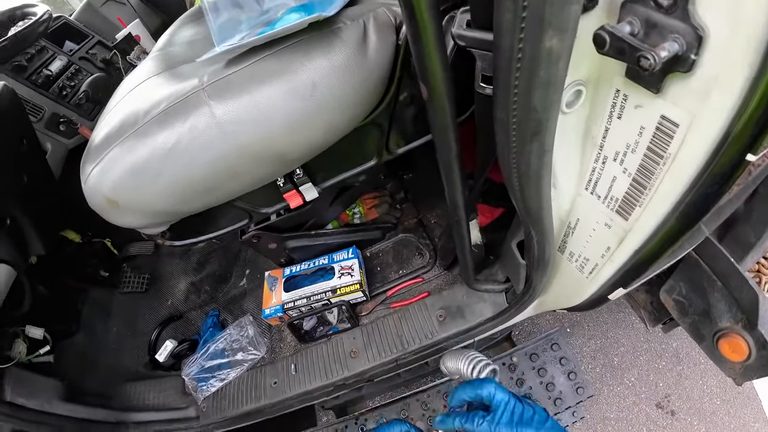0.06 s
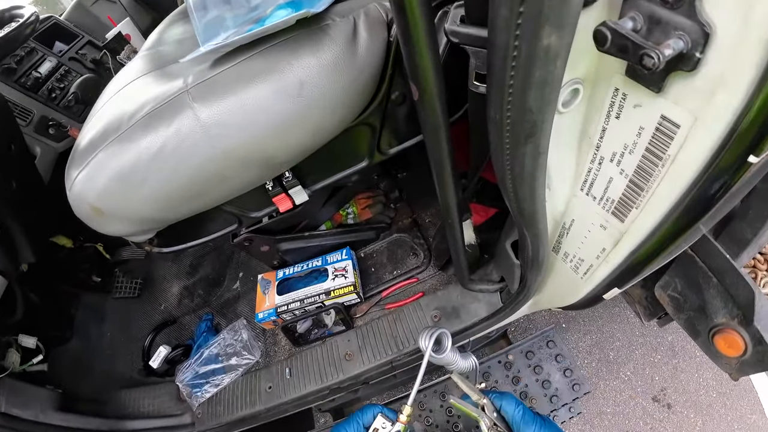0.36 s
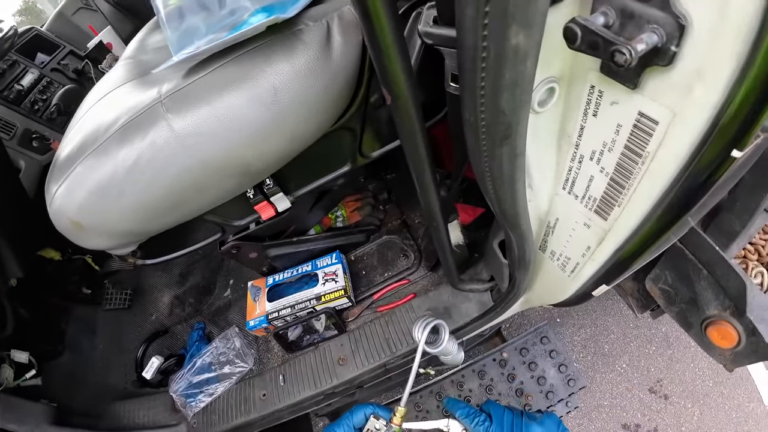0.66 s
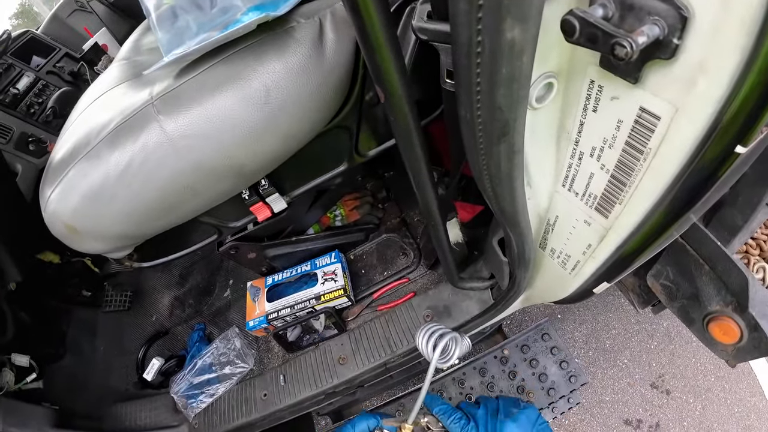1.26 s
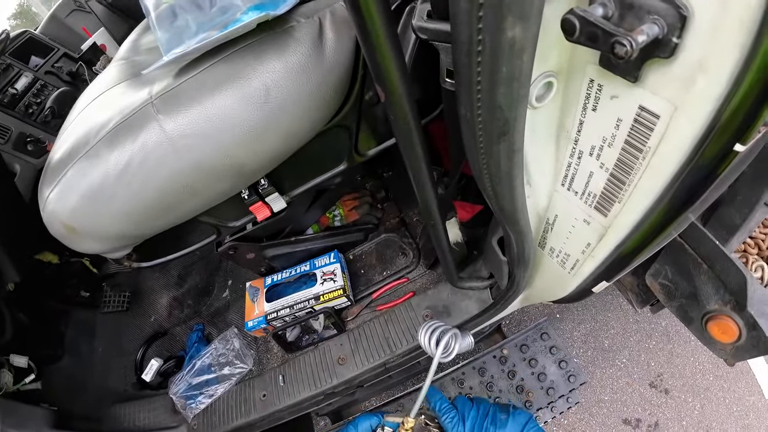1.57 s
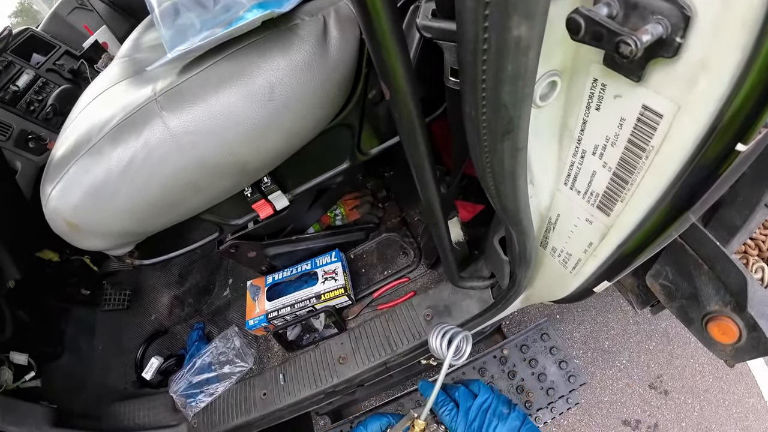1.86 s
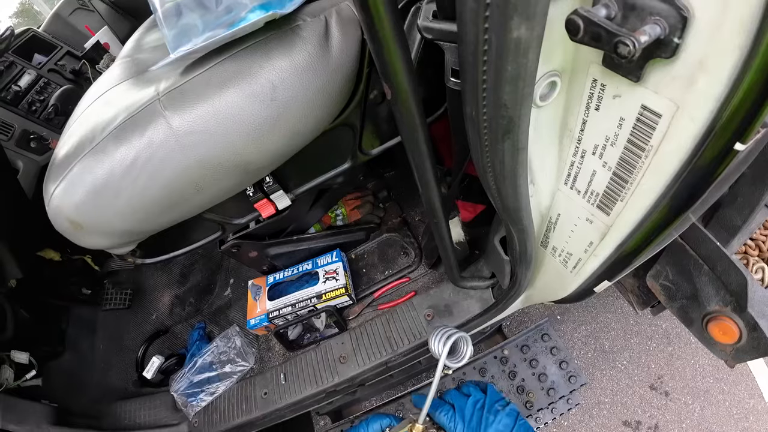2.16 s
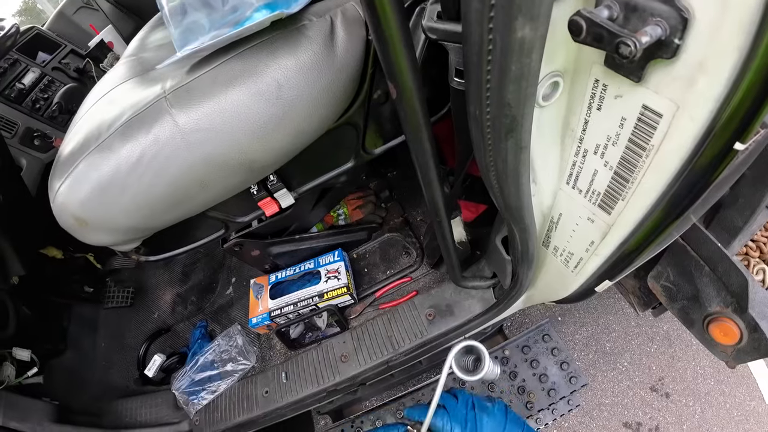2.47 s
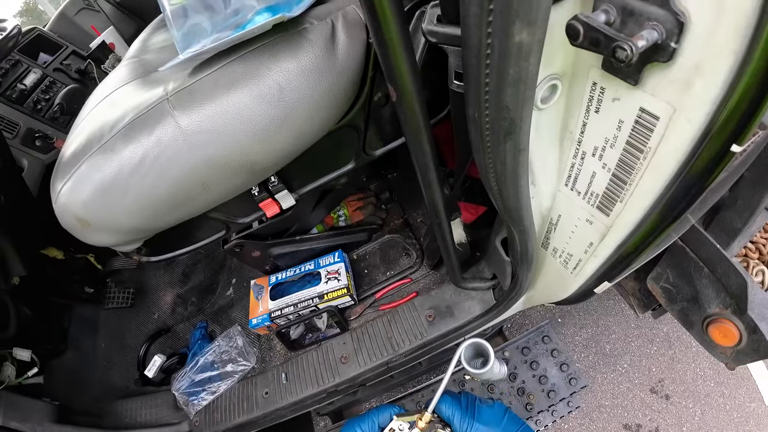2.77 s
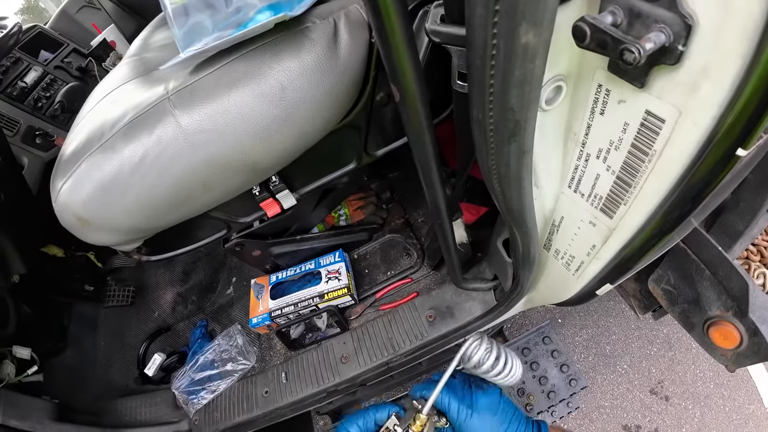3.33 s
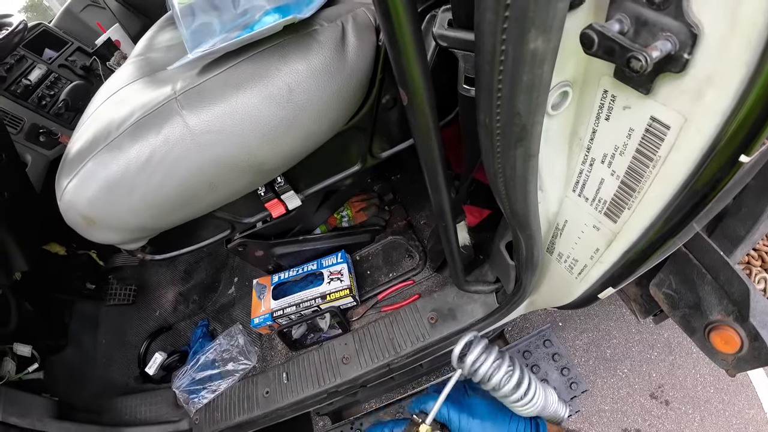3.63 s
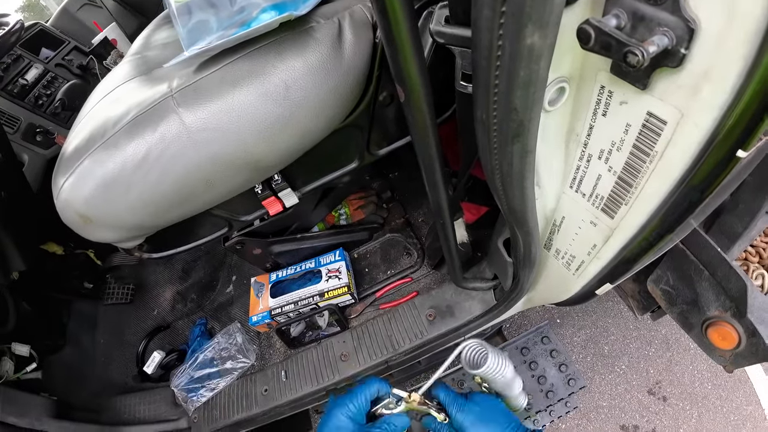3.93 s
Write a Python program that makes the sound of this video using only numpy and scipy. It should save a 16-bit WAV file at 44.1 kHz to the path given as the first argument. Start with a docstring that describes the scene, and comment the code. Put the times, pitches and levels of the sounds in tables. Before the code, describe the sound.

A coiled metal hose and its fitting clack and click as gloved hands turn them. One hollow clack comes first, then a small rattle and a cluster of sharp clicks, close by an open vehicle door over low outdoor rumble.

```python
"""Hollow clacks and sharp clicks sound as gloved hands turn a coiled metal hose and its brass fitting.
The parts knock together and ring, a loose piece rattles with a thin note, and the gloves rub softly.
The cab behind an open vehicle door gives each sound a short echo.
Underneath lie a low outdoor rumble, a faint machine hum and a far-off hiss."""
import sys
import numpy as np
from scipy import signal
from scipy.fft import rfft, irfft
from scipy.io import wavfile

SR = 44100
rng = np.random.default_rng(int(sys.argv[2]) if len(sys.argv) > 2 else 0)


def generate_wav(sig):
    """Save sig (samples, or channels by samples) to the path in sys.argv[1] as 16-bit PCM at SR."""
    pcm = np.round(np.clip(np.atleast_2d(sig).T, -1, 1) * 32767).astype(np.int16)
    wavfile.write(sys.argv[1], SR, pcm)


N = 176400
HIT_S = .25  # time allowed for one hit to die away

# The tone of the tick in a bounce or a light tap. Each row: frequency in Hz, level in dB.
TICK_COLOUR = [(500, -6), (1900, -7), (3000, 5.5), (4800, 0), (7700, -5.5), (8800, -12), (11500, -11.5),
               (13500, -25)]
TICK_FADE_S, TICK_ECHO_DB = .011, -9.5  # every fade time is the time to fall by 60 dB


def clacks():
    """A bright snap sets the hollow hose ringing, as far as the grip lets it."""
    # Each row: start in seconds, level in dB, treble limit in Hz, snap level in dB,
    # ring level in dB compared with the knock.
    hits = [(0.107, -32.5, 1060, -41, -20), (0.7461, -12.5, 6600, -31.5, -6.5),
            (0.8386, -34, 1490, -63, -26), (0.9079, -32, 2770, -50, -17), (3.2358, -17, 4170, -34.5, -16)]
    # The tone of the knock. Each row: frequency in Hz, level in dB.
    knock_colour = [(150, -13), (440, 0.5), (800, -1.5), (1150, -2), (1900, 3), (2600, -4), (3700, 0),
                    (5600, -3.5), (6800, -10.5), (13500, -3)]
    # The notes of the hose. Each row: pitch in Hz, level in dB, fade time in seconds.
    hose_notes = [(1250, -9, .1), (1470, -6, .06), (1740, -2, .03), (1890, 3, .018), (2930, 3, .028),
                  (5550, -2, .022)]
    out = np.zeros((2, N))
    for start, db, edge_hz, snap_db, ring_db in hits:
        knock = contact(knock_colour, fade_s=0.04, attack_s=0.0016)
        body = soften(knock + amp(ring_db) * ring(hose_notes), edge_hz)
        add(out, start, amp(db) * unit_hit(body) + amp(snap_db) * snap())
    return cab_echo(out, echo_db=-11)


def clicks():
    """Metal parts meet, and the rubber of the gloves snaps now and then; the hand damps the metal, so light
    clicks hardly ring."""
    # Each row: start in seconds, level in dB, brightness in dB per octave, fade time in seconds.
    hits = [(1.0291, -48, -3.5, 0.017), (1.1154, -38.5, -4.5, 0.034), (1.1208, -40, -0.5, .025),
            (2.066, -53, -1, 0.017), (2.203, -49, -2.5, 0.082), (3.1862, -12, 1, 0.015),
            (3.1942, -22, 2, 0.015), (3.739, -37, 2, 0.046), (3.8956, -18.5, -1.5, 0.017),
            (3.902, -37, 2, 0.073), (3.909, -37, 4, 0.017), (3.9305, -30, -7.5, 0.026),
            (3.9352, -30, -12.5, 0.017), (3.9567, -38.5, -12.5, 0.097), (3.9804, -39, -9, 0.051)]
    # The tone of a click. Each row: frequency in Hz, level in dB.
    click_colour = [(400, -54), (1400, -19), (1850, -6.5), (3200, -2), (4000, -1), (6100, -2.5), (7000, -4),
                    (11400, -9), (13200, -22), (15500, -21)]
    # The notes of the metal. Each row: pitch in Hz, level in dB, fade time in seconds.
    metal_notes = [(2170, -12, .05), (3720, -1, .028), (4100, 1, .03), (4970, -4, .03), (5850, 2, .03),
                   (6345, 3, .035), (6480, -35, .55), (9920, -9, .025)]
    # Snaps of the gloves' rubber. Each row: start in seconds, level in dB.
    rubber_snaps = [(0.073, -60), (0.4452, -44), (3.935, -37), (3.988, -22.5)]
    out = np.zeros((2, N))
    firmest_db = max(row[1] for row in hits)
    for start, db, tilt_db, fade_s in hits:
        click = contact(click_colour, fade_s, tilt_db, attack_s=0.0016)
        ring_db = -0.5 + (db - firmest_db) / 2
        add(out, start, amp(db) * unit_hit(click + amp(ring_db) * ring(metal_notes)))
    for start, db in rubber_snaps:
        add(out, start, amp(db) * snap())
    return cab_echo(out, echo_db=-16)


def snap():
    """A brief contact that is almost all high treble."""
    # Its tone. Each row: frequency in Hz, level in dB.
    snap_colour = [(500, -102), (5000, 1.5), (8500, 3), (10000, 14), (11800, 9), (13200, -13), (15500, 1)]
    return contact(snap_colour, fade_s=0.022)


def rattle(detune=.007):
    """A loose piece bounces on the fitting: a tick and a thin ring whose pitches shift with the grip."""
    # Each row: start in seconds, level in dB.
    bounces = [(1.7293, -46), (1.741, -44.5), (1.7495, -46), (1.7596, -39), (1.7703, -27), (1.783, -26.5),
               (1.8003, -33.5), (3.2075, -31), (3.3692, -33.5), (3.3771, -28), (3.3893, -36), (3.404, -46),
               (3.458, -43)]
    # How the piece is held. Each row: start in seconds, then the pitches of its three notes in Hz.
    grips = [(1.7, 3540, 6120, 8100), (3.2, 3450, 6230, 5005), (3.45, 3600, 6500, 5200)]
    # Those three notes, in the same order. Each row: level in dB, fade time in seconds.
    note_shapes = [(-10, .026), (0, .03), (-8, .021)]
    out = np.zeros((2, N))
    for start, db in bounces:
        pitches = [grip[1:] for grip in grips if grip[0] <= start][-1]
        strayed = [hz * (1 + detune * rng.standard_normal()) for hz in pitches]
        notes = [(hz, *shape) for hz, shape in zip(strayed, note_shapes)]
        bounce = contact(TICK_COLOUR, TICK_FADE_S) + amp(2.5) * ring(notes)
        add(out, start, amp(db) * unit_hit(bounce))
    return cab_echo(out, TICK_ECHO_DB)


def light_taps(note_fade_s=.010):
    """A light tap gives a tick and one short note."""
    # Each row: start in seconds, level in dB, pitch in Hz, note level in dB compared with the tick.
    taps = [(1.2744, -40, 3630, 1), (1.819, -33, 4420, 0), (2.332, -39, 3700, -4), (3.419, -38.5, 4680, 0)]
    out = np.zeros((2, N))
    for start, db, hz, note_db in taps:
        tap = contact(TICK_COLOUR, TICK_FADE_S) + amp(note_db) * ring([(hz, 0, note_fade_s)])
        add(out, start, amp(db) * unit_hit(tap))
    return cab_echo(out, TICK_ECHO_DB)


def gloves(slips_per_s=11000, spread_db=3):
    """Tiny slips of rubber on metal swell and fade with each stroke."""
    # Each row: middle of the stroke in seconds, length in seconds, level in dB.
    strokes = [(.07, 0.19, -62.5), (0.344, 0.095, -59.5), (1.563, .018, -55), (2.456, 0.014, -53.5),
               (2.519, 0.019, -53), (3.61, 0.056, -61.5), (3.99, 0.098, -44)]
    # The tone of the rubbing. Each row: frequency in Hz, level in dB.
    rub_colour = [(1000, -21), (4000, 0), (10300, 1), (13300, -14), (15500, -9)]
    level = np.zeros((2, N))
    for middle, length, db in strokes:
        swell = np.sin(np.linspace(0, np.pi, round(length * SR) + 2))
        add(level, middle - length / 2, amp(db) * swell[None])
    slipping = rng.random(N) < slips_per_s / SR
    strength = amp(spread_db * rng.standard_normal(N))
    slips = slipping * strength * rng.standard_normal((2, N))
    return cab_echo(level * unit(stereo(colour(slips, rub_colour))), echo_db=-9)


def cab_echo(x, echo_db, build_s=0.0081):
    """Adds the short, blurred echo of the open cab; its treble dies first."""
    # Each row: frequency in Hz, fade time in seconds.
    fade_times = [(1500, 0.13), (4000, 0.077), (10000, 0.072)]
    hz, t, bands = signal.stft(rng.standard_normal((2, SR // 2)), SR, nperseg=256)
    fade = amp(-60 * t / read(fade_times, hz)[:, None])
    tail = signal.istft(bands * fade, SR, nperseg=256)[1]
    build_up = 1 - np.exp(-np.arange(tail.shape[1]) / SR / build_s)
    tail = stereo(tail * build_up)
    tail = tail / np.linalg.norm(tail[0])
    return x + amp(echo_db) * signal.fftconvolve(x, tail, axes=1)[:, :N]


def outdoors():
    """Low rumble, faint far-off hiss and a wavering machine hum, each gently rising and falling."""
    # The tones of the rumble and the hiss. Each row: frequency in Hz, level in dB.
    rumble_colour = [(24, -9.5), (36, -1), (50, -5.5), (90, 1), (113, -8), (170, 0), (230, -14.5),
                     (285, -9), (380, -11.5), (410, -22.5), (1000, -83)]
    hiss_colour = [(300, -9.5), (450, -2.5), (540, -6.5), (950, -6), (1300, -5), (2100, -13), (5200, -21),
                   (8500, -31), (11500, -36.5), (13300, -50)]
    # How wide both sound. Each row: frequency in Hz, level of the sides over the middle in dB.
    width = [(25, 4.5), (80, -22.5), (200, -23.5), (480, -26), (1900, -14.5), (3800, -3.5), (7500, -0.5)]
    # The notes of the machine. Each row: pitch in Hz, level in dB, how far the pitch strays in Hz.
    hum_notes = [(34.3, -42.5, 2.14), (178.2, -44, 3.06), (255, -46, 1.74)]
    out = np.zeros((2, N))
    for tone, db, swell_db, rate_hz in (rumble_colour, -32.5, 1, 2.7), (hiss_colour, -50, 0.67, 4.4):
        level = amp(db + swell_db * drift(rate_hz))
        noise = colour(rng.standard_normal((2, N)), tone)
        out += level * unit(stereo(noise, width))
    for hz, db, waver_hz in hum_notes:
        level = amp(db + 3.5 * drift(rate_hz=6.2))
        pitch = hz + waver_hz * drift(rate_hz=6.94)
        out += level * unit(np.sin(2 * np.pi * np.cumsum(pitch) / SR))
    return out


def contact(tone, fade_s, tilt_db=0, attack_s=0.00015):
    """The noisy, fast-dying vibration of two parts touching."""
    t = np.arange(round(HIT_S * SR)) / SR
    shape = (1 - np.exp(-t / attack_s)) * amp(-60 * t / fade_s)
    burst = rng.choice([-1., 1.], (2, len(t))) * shape
    return unit_hit(stereo(colour(burst, tone, tilt_db)))


def ring(notes, attack_s=0.000087):
    """The fading notes of a part, struck a little differently each time."""
    t = np.arange(round(HIT_S * SR)) / SR
    pair = sum(amp(db - 60 * t / fade_s) * np.sin(2 * np.pi * (hz * t + rng.random((2, 1))))
               for hz, db, fade_s in notes)
    return unit_hit(stereo(pair * (1 - np.exp(-t / attack_s))))


def soften(x, edge_hz):
    """A softer, longer contact stirs up little treble above edge_hz."""
    return signal.sosfilt(signal.butter(4, min(edge_hz, SR / 3), fs=SR, output="sos"), x)


def stereo(pair, width=None):
    """Spreads two unrelated signals to left and right, one as the middle and one as the sides."""
    # The usual width: narrow bass, wide treble.
    # Each row: frequency in Hz, level of the sides over the middle in dB.
    hit_width = [(500, -25), (2500, -19), (7500, -7.5), (15000, 1)]
    side = colour(pair[1], width or hit_width)
    return np.array([pair[0] + side, pair[0] - side])


def colour(x, points, tilt_db=0):
    """Shapes the tone of a sound from a table, tilted by tilt_db per octave."""
    hz = abs(np.fft.fftfreq(x.shape[-1], 1 / SR))
    octaves = np.log2(np.maximum(hz, points[0][0]) / points[0][0])
    gain = amp(read(points, hz) + tilt_db * octaves)
    response = np.exp(np.conj(signal.hilbert(np.log(gain))))  # rings after a hit, not before it
    return np.fft.ifft(np.fft.fft(x) * response).real


def drift(rate_hz):
    """A slow random curve with a typical size of 1."""
    hz = np.fft.rfftfreq(N, 1 / SR)
    return unit(irfft(rfft(rng.standard_normal(N)) * (hz > 0) * np.exp(-(hz / rate_hz) ** 2), N))


def amp(db):
    """Turns decibels into a gain."""
    return 10 ** (np.asarray(db) / 20)


def unit(x):
    """Scales a sound to an average (rms) level of 1."""
    return x / np.sqrt(np.mean(x ** 2) + 1e-20)


def unit_hit(x, reference_s=.005):
    """Gives a hit the energy of a sound at level 1 that lasts reference_s."""
    return unit(x) * np.sqrt(reference_s * SR / x.shape[-1])


def read(points, hz):
    """Reads between the rows of a table, with octaves evenly spaced."""
    row_hz, value = np.transpose(points)
    return np.interp(np.log(hz + 1), np.log(row_hz + 1), value)


def add(mix, start, sound):
    """Mixes in a stereo sound at a start time in seconds."""
    part = mix[:, max(round(start * SR), 0):][:, :sound.shape[1]]
    part += sound[:, :part.shape[1]]


def scene():
    """The handling of the hose over the outdoor background."""
    return clacks() + clicks() + rattle() + light_taps() + gloves() + outdoors()


def record(dry):
    """Cuts the highest treble, above 15900 Hz."""
    low_pass = signal.firwin(255, 15900, window=("kaiser", 9), fs=SR)
    return signal.oaconvolve(dry, low_pass[None], "same")


dry = scene()
out = record(dry)
generate_wav(out)
```